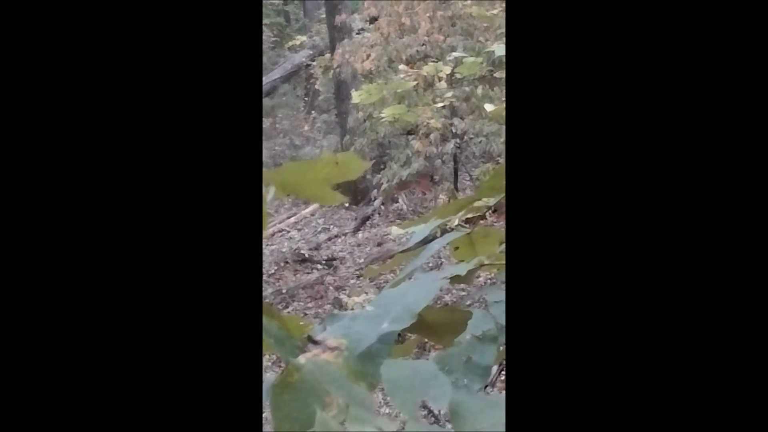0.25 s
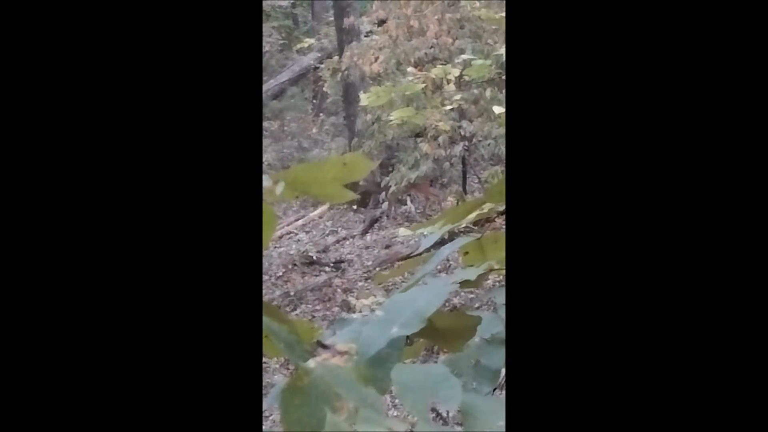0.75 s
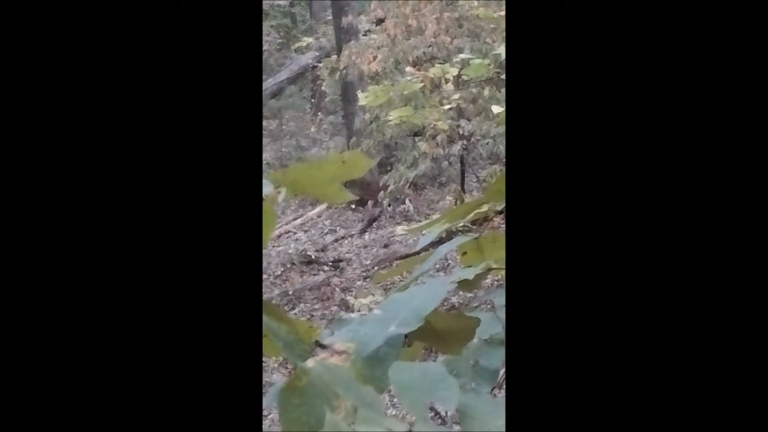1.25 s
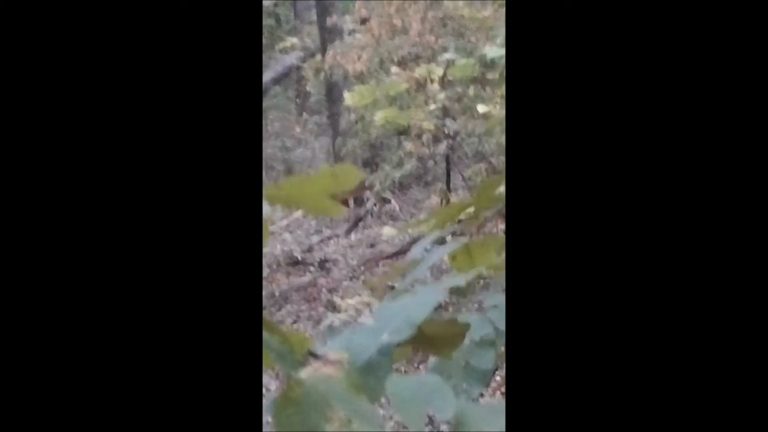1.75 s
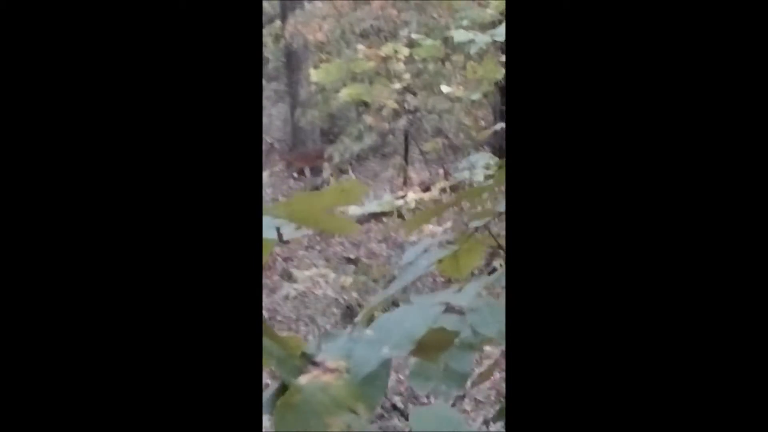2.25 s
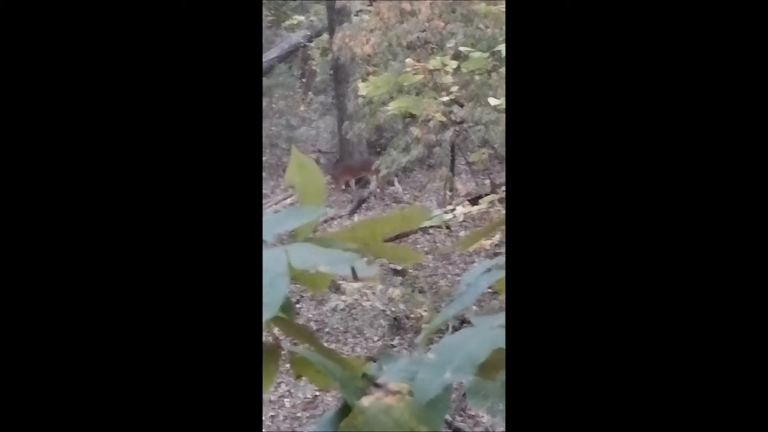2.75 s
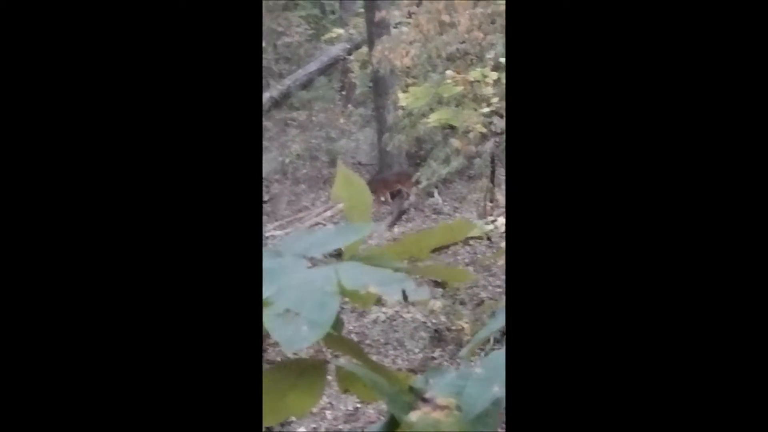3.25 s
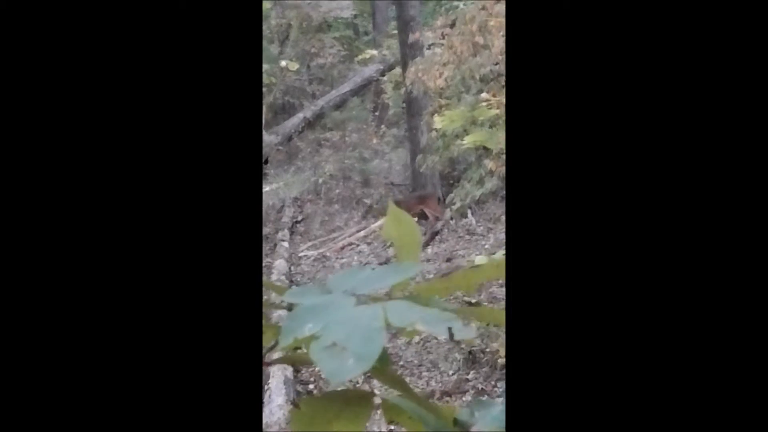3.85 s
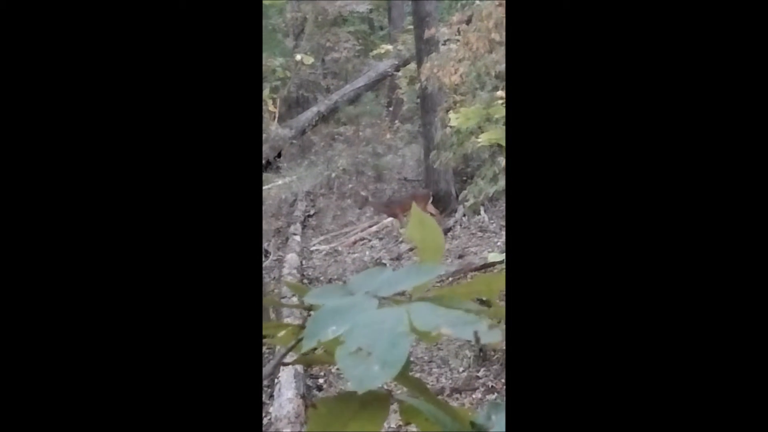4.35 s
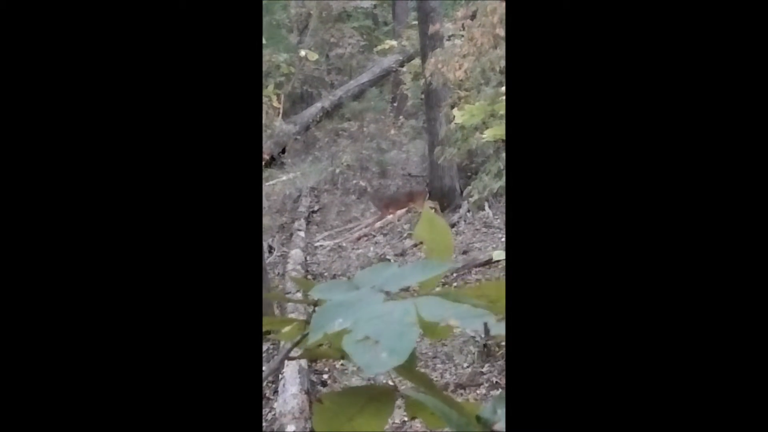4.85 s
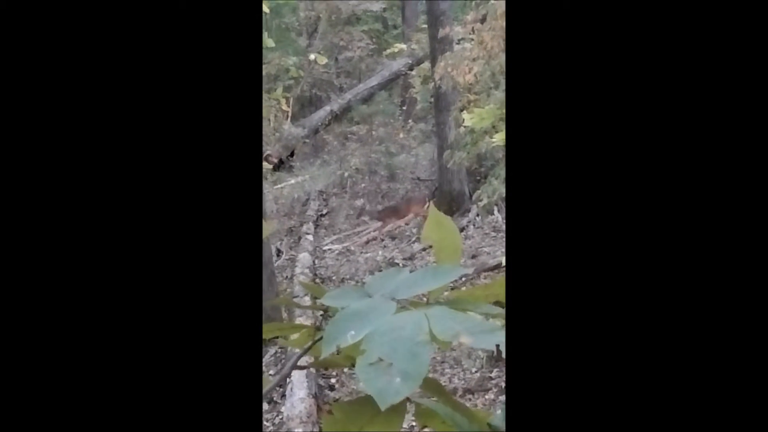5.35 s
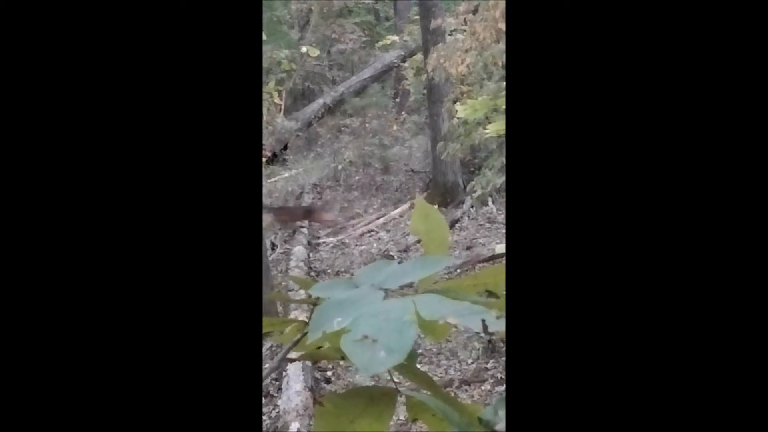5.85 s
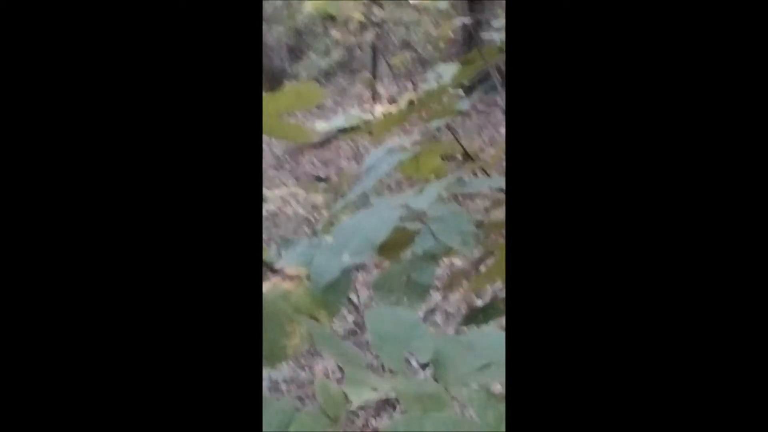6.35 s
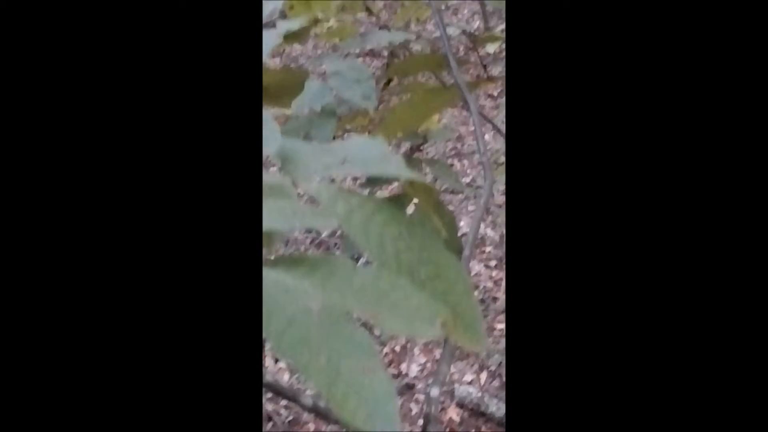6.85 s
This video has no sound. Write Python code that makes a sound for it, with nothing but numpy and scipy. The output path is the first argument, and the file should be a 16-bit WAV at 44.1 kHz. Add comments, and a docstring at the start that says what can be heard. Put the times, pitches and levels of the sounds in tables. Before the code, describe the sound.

Bush crickets chirp in short pulsed tones over a faint distant chorus and soft air noise in open woodland. After nearly five seconds of small fidgeting, a close bow release cracks out very loudly and dies fast, with only a thin scatter from the trees. The archer then moves, rustling cloth and leaves, with low bumps, sharp clicks and a faint sinking swish.

```python
"""Quiet autumn woodland at a camera's microphones: a faint hush of air noise with low puffs at the ports.
Bush crickets chirp all around in short tone pulses, over a far chorus and a lower trill of narrow noise.
Close by, an archer's sleeves and dry leaves rustle as grainy noise, with small ringing clicks.
At about five seconds the bow is shot: the string whips, slams home, and the bow knocks, buzzes and shudders.
The rustling grows as the bow is lowered, with low soft bumps and a faint hollow swish that sinks in pitch."""
import sys
import numpy as np
from scipy import signal
from scipy.fft import rfft, irfft, next_fast_len
from scipy.io import wavfile
from scipy.ndimage import uniform_filter1d, map_coordinates

SR = 44100
rng = np.random.default_rng(int(sys.argv[2]) if len(sys.argv) > 2 else 0)


def pcm_store(signal):
    """Save signal as 16-bit PCM."""
    levels = np.round(np.clip(np.atleast_2d(signal), -1, 1) * 32767)
    wavfile.write(sys.argv[1], SR, levels.astype(np.int16).T)


N = 312669
TIME = np.arange(N) / SR
SIDES = np.array([[.5], [-.5]])  # shares a left-minus-right value between the left and right port


def amp(db):
    """Decibels to gain."""
    return 10 ** (np.asarray(db) / 20)


def unit(x):
    """Scaled to rms 1."""
    return x / np.sqrt(np.mean(x ** 2) + 1e-20)


def along(points, hz):
    """Reads a curve of (Hz, value) points on a log frequency axis."""
    f, v = np.transpose(points)
    return np.interp(np.log(hz + 1), np.log(f + 1), v)


def wobble(rate):
    """A smooth random curve with this many random knots a second."""
    knots = rng.standard_normal(int(N * rate / SR) + 4)
    return map_coordinates(knots, [TIME * rate])


def fade(t, t60):
    """Exponential decay by 60 dB in t60 seconds, silent before t = 0."""
    return (t >= 0) * np.exp(-np.log(1000) * np.abs(t) / t60)


def swell(s, db, rise, t60):
    """Gain of one movement: a smooth rise, then an exponential decay."""
    t = TIME - s
    onset = np.sin(np.pi / 2 * np.clip(t / rise, 0, 1)) ** 2
    return amp(db) * onset * fade(np.maximum(t - rise, 0), t60)


def together(swells):
    """Overlapping movements add in power."""
    return np.sqrt(sum(g ** 2 for g in swells))


def add(track, s, sound):
    """Mixes a sound in at s seconds; a negative start plays from zero."""
    part = track[..., max(round(s * SR), 0):][..., :sound.shape[-1]]
    part += sound[..., :part.shape[-1]]


def filtered(x, response):
    """Shapes x by a response, possibly complex, given as a function of frequency."""
    m = next_fast_len(N + 8192)
    return irfft(rfft(x, m) * response(np.fft.rfftfreq(m, 1 / SR)), m)[..., :N]


def rush(spectrum, alike, grain=1):
    """Coloured stereo noise of rms 1, excited evenly or in grains."""
    def mid_side(hz):
        # this split of mid and side power gives the wanted left-right correlation
        turn = np.arccos(np.clip(along(alike, hz), -1, 1)) / 2
        return amp(along(spectrum, hz)) * np.array([np.cos(turn), np.sin(turn)])
    mid, side = filtered(grain * rng.standard_normal((2, N)), mid_side)
    return unit(np.array([mid + side, mid - side]))


def place(x, balance, lead_ms):
    """A near sound reaches the left port first; the camera body shades each port by frequency."""
    def ports(hz):
        early = np.exp(2j * np.pi * hz * SIDES * lead_ms / 1000)
        return amp(SIDES * along(balance, hz)) * early
    return filtered(x, ports)


def ring(modes, t, attack):
    """Damped modes, each (Hz, dB, t60 in s), set going by one blow."""
    tones = sum(amp(db) * fade(t, t60) * np.sin(2 * np.pi * hz * t) for hz, db, t60 in modes)
    return tones * (1 - np.exp(-t / attack))


# How long the trees scatter sound back. Each row: frequency in Hz, t60 in seconds.
TREE_DECAY = [(200, .3), (2000, 0.29), (5000, 0.36), (14000, 0.51)]


def woods(x):
    """Trunks and foliage scatter back a thin noise tail that decays differently by frequency."""
    hz, t, z = signal.stft(rng.standard_normal((2, SR // 2)), SR, nperseg=256)
    decay = fade(t, along(TREE_DECAY, hz)[:, None])
    tail = signal.istft(z * decay, SR, nperseg=256)[1]
    return signal.fftconvolve(x, tail / np.linalg.norm(tail[0]), axes=1)[:, :N]


# Colour of the hush. Each row: frequency in Hz, relative level per Hz in dB.
HUSH_COLOUR = [(59, -25.5), (100, 0), (500, -12), (925, -14.5), (1860, -20.5), (3900, -22.5), (4720, -19),
               (6220, -24.5), (11300, -22.5), (12800, -23.5), (13900, -19), (15800, -21)]
# Colour of the puffs and drift at the ports. Each row: frequency in Hz, relative level per Hz in dB.
PUFF_COLOUR = [(8.8, -28), (15, 5.5), (35, -.5), (75, -8.5), (161, -25.5), (200, -23.5), (260, -52),
               (440, -120)]
# How alike the ports hear air and far crickets. Each row: frequency in Hz, left-right correlation.
FAR_ALIKE = [(60, .3), (130, 0.23), (600, 0.33), (1400, 0.18), (3000, 0.022)]
# Puffs at the ports, from breeze or moving camera. Each row: start in seconds, level in dB before the flow trim.
AIR_PUFFS = [(.47, -65), (.64, -64), (.98, -65.5), (1.67, -65), (1.82, -68), (2.29, -64.5), (3.47, -66),
             (5.64, -54), (6.01, -61.5), (6.2, -54), (6.6, -61.5)]
PUFF_RISE_S, PUFF_T60_S = .05, .4  # every puff swells and dies alike
BREEZE_DB, GUSTY_DB = -72.5, 1.5  # steady drift before the flow trim, and its random swing
FLOW_TRIM_DB = 4


def air():
    """A faint even hush; air moving at the microphone ports makes low noise that drifts and puffs."""
    hush = amp(-69.5 + 0.37 * wobble(2)) * rush(HUSH_COLOUR, FAR_ALIKE)
    drift = amp(BREEZE_DB + GUSTY_DB * wobble(5))
    puffs = [swell(s, db, PUFF_RISE_S, PUFF_T60_S) for s, db in AIR_PUFFS]
    flow = together([drift] + puffs)
    return hush + amp(FLOW_TRIM_DB) * flow * rush(PUFF_COLOUR, FAR_ALIKE)


# The nearer chirps. Each row: start in seconds, middle pitch in Hz, level in dB before scattering and trim.
NEAR_CHIRPS = [(-.05, 4770, -72), (.04, 5230, -75), (.2, 5020, -75), (.3, 4890, -75), (.535, 4760, -70),
               (1.015, 4920, -70.5), (1.048, 4720, -72), (1.48, 4740, -73), (1.57, 4620, -75),
               (1.67, 5020, -78), (1.935, 5195, -65.3), (2.22, 4710, -72), (2.28, 5030, -75.5),
               (2.44, 4780, -78), (2.99, 4920, -72.5), (3.14, 4900, -78), (3.6, 4550, -73),
               (3.89, 5190, -68.5), (4.04, 5070, -77), (4.235, 4730, -72), (4.275, 5210, -74),
               (4.36, 4730, -73.5), (4.55, 4700, -72), (4.77, 4920, -77), (6.54, 4710, -69),
               (6.599, 5230, -70.5), (6.92, 4840, -74.5)]
# A lower, steady cricket. Each row: start in seconds, end in seconds.
TRILL_SPANS = [(1.25, 2.23), (4.2, 4.95)]
# Colour of the far crickets. Each row: frequency in Hz, relative level per Hz in dB.
CHORUS_COLOUR = [(4300, -34), (4600, 1.5), (4780, 0.5), (5050, -4.5), (5400, -49)]
CHIRP_S, CHIRP_FALL = .145, .012  # length of a chirp, and the share by which its pitch falls


def chirp_call(hz, pace, lag, pulse_hz=59, sag=0.024):
    """One chirp at both ports: each wing stroke is a short tone that sags in pitch."""
    t = np.arange(int(CHIRP_S * SR)) / SR
    stroke = t * pulse_hz * (1 + .04 * pace) % 1  # position within the wing stroke, 0 to 1
    pitch = hz * (1 + sag * (1 - 2 * stroke) + CHIRP_FALL * (.5 - t / CHIRP_S))
    tone = np.sin(2 * np.pi * np.cumsum(pitch) / SR + SIDES * lag)
    return tone * np.sin(np.pi * stroke) ** 2 * signal.windows.tukey(len(t), .3)


def crickets(spread_db=3, trill_hz=2640):
    """Pulsed chirps smeared by the woods, a trill and a far chorus of narrow-band noise."""
    calls = np.zeros((2, N))
    for (s, hz, db), (pan, lag, pace) in zip(NEAR_CHIRPS, rng.standard_normal((len(NEAR_CHIRPS), 3))):
        # every chirp sits in its own direction
        add(calls, s, amp(db + spread_db * pan * SIDES) * chirp_call(hz, pace, lag))
    calls = calls * amp(2.0 * wobble(50))  # the strokes vary in strength
    scattered = .8 * calls + woods(calls)
    on = sum(1. * ((TIME > start) & (TIME < end)) for start, end in TRILL_SPANS)
    singing = uniform_filter1d(on, size=4000)  # soft starts and ends
    trill_colour = [(trill_hz * .8, -60), (trill_hz * .98, 0), (trill_hz * 1.02, 0), (trill_hz * 1.2, -60)]
    trill = amp(-88.5 + 2 * wobble(12)) * singing * rush(trill_colour, FAR_ALIKE)
    chorus = amp(-89.3 + 2 * wobble(4)) * rush(CHORUS_COLOUR, FAR_ALIKE)
    return amp(-1.5) * scattered + trill + chorus


BAND_S, BAND_DB, BAND_RISE_S, BAND_T60_S = 6.055, -65, .025, .9
# where the band starts and ends, how fast it sinks, and roughly how wide it is
BAND_HZ, BAND_FLOOR_HZ, BAND_SAG_HZ_PER_S, BAND_WIDTH_HZ = 1830, 1350, 4000, 520


def sinking_band():
    """A narrow band of noise that sinks in pitch, then holds at a floor as it fades."""
    sinking = BAND_HZ - BAND_SAG_HZ_PER_S * (TIME - BAND_S)
    hz = np.clip(sinking, BAND_FLOOR_HZ, BAND_HZ)
    flutter = wobble(BAND_WIDTH_HZ) + 1j * wobble(BAND_WIDTH_HZ)
    band = flutter * np.exp(2j * np.pi * np.cumsum(hz) / SR)
    return swell(BAND_S, BAND_DB, BAND_RISE_S, BAND_T60_S) * unit(band.real)


# Strokes of sleeves and leaves, small while aiming, larger as the bow is lowered.
# Each row: start in seconds, level in dB before the rustle trim, rise in seconds, t60 in seconds.
RUB_STROKES = [(.151, -77, .09, .9), (.28, -73.2, .02, .34), (.841, -77.6, .07, 1.6),
               (1.18, -72.2, .14, .45), (1.506, -70, .005, .1), (1.53, -80, .04, 1.8),
               (1.63, -73, .005, .1), (2.45, -77.2, .025, 1), (2.468, -77.3, .3, 2),
               (3.764, -74.6, .09, .55), (3.877, -75.2, .085, .77), (4.19, -74.5, .02, .5),
               (4.819, -69.8, .275, .92), (5.136, -66, .1, 1.13), (5.258, -60.7, .02, .17),
               (5.371, -67.4, .12, .5), (5.489, -53.4, .036, .31), (5.508, -51, .05, .48),
               (5.604, -54.3, .025, .38), (5.652, -45.6, .019, .27), (5.668, -48, .052, .17),
               (5.736, -64.8, .085, 1.23), (5.928, -67.8, .027, 1.5), (6.03, -63, .055, .14),
               (6.148, -60.3, .03, .3), (6.179, -54.8, .024, .59), (6.264, -62.2, .028, .14),
               (6.298, -76.3, .15, 1.06), (6.595, -67.1, .04, .24), (6.627, -64.9, .036, 1.17)]
# Low soft bumps: one as the bow is shot, the others during handling.
# Each row: start in seconds, level in dB, t60 in seconds.
LOW_BUMPS = [(4.969, -46, .33), (5.506, -58, .15), (5.658, -41.3, .15), (5.705, -49, .13),
             (6.02, -63.5, .5), (6.161, -59.5, .25), (6.235, -64, .25)]
# Colour of sleeves and leaves. Each row: frequency in Hz, relative level per Hz in dB.
RUSTLE_COLOUR = [(200, -15), (450, -8.5), (1000, -7), (1400, -5), (2000, -3.2), (2800, -5.2), (4200, -4.2),
                 (6000, -1), (8300, -2), (10500, -4.5), (15800, -12.5)]
# Colour of the low bumps. Each row: frequency in Hz, relative level per Hz in dB.
BUMP_COLOUR = [(20, -13), (40, -2), (110, -.5), (200, -4), (300, -8.5), (450, -22.5), (900, -53)]
# Colour of the soft noise in the swish. Each row: frequency in Hz, relative level per Hz in dB.
SWISH_COLOUR = [(250, -22), (560, -3.5), (900, -6), (1400, -1), (2100, -9), (4000, -8), (9000, -36)]
# How alike the ports hear close noise. Each row: frequency in Hz, left-right correlation.
CLOSE_ALIKE = [(150, .93), (600, .8), (1500, 0.36), (4000, 0.13), (15000, 0.083)]
# Lean of the rustling between the ports. Each row: frequency in Hz, left minus right in dB.
RUSTLE_BALANCE = [(500, 3), (1600, -4.5), (5000, -2.5), (12000, -2)]
FIDGET_DB, RUSTLE_TRIM_DB = -89, 2.8  # the archer is never quite still; trim on all rubbing
BUMP_SHARE_DB = -12  # how much of every stroke, before its trim, reaches the camera through the arm
BUMP_RISE_S = .008  # a soft onset
SWISH_S, SWISH_DB, SWISH_RISE_S, SWISH_T60_S = 6.09, -57, .14, .32  # a faint hollow swish


def rustling(crackles_per_s=130):
    """Cloth and dry leaves rub in dense tiny slips with stray crackles; low bumps and a swish join in."""
    rub = together([amp(FIDGET_DB)] + [swell(*stroke) for stroke in RUB_STROKES])
    thuds = [swell(s, db, BUMP_RISE_S, t60) for s, db, t60 in LOW_BUMPS]
    handling = together([amp(BUMP_SHARE_DB) * rub] + thuds)
    slips = amp(1.7 * wobble(1500) + 1.4 * wobble(90))
    breaks = (rng.random(N) < crackles_per_s / SR) * amp(5 * rng.standard_normal(N))
    crackle = signal.fftconvolve(breaks, fade(np.arange(SR // 100) / SR, 0.0036))[:N]
    texture = rush(RUSTLE_COLOUR, CLOSE_ALIKE, grain=slips)
    texture = texture + amp(-10) * rush(RUSTLE_COLOUR, CLOSE_ALIKE, grain=crackle)
    rustle = amp(RUSTLE_TRIM_DB) * rub * texture
    bumps = handling * rush(BUMP_COLOUR, CLOSE_ALIKE)
    swish_gain = swell(SWISH_S, SWISH_DB, SWISH_RISE_S, SWISH_T60_S)
    swish = swish_gain * rush(SWISH_COLOUR, CLOSE_ALIKE, grain=slips) + sinking_band()
    return place(rustle + swish, RUSTLE_BALANCE, lead_ms=.25) + bumps


# Small clicks nearby. Each row: start in seconds, level in dB, pitch in Hz, t60 in seconds,
# broadband snap in dB relative to that level, left minus right in dB.
SMALL_CLICKS = [(1.718, -72, 3000, .014, 8.5, 4), (1.728, -74, 3000, .014, 9, 4),
                (4.7153, -71, 3520, .018, 8.5, 4), (5.273, -61, 2170, .045, 2, -3.5),
                (5.513, -61, 1900, .029, -3, -3), (5.622, -51.5, 2070, .05, 1, -4),
                (5.662, -48, 3450, .027, 6, -3), (5.829, -56, 2220, .033, 0, -3.5),
                (6.014, -46, 3040, .0076, -2, -5.5), (6.0505, -46.5, 4460, .017, -4.5, -5),
                (6.0603, -36.3, 3180, .008, -12, -8)]
# Colour of a click's snap. Each row: frequency in Hz, relative level per Hz in dB.
SNAP_COLOUR = [(250, 0), (600, -3.5), (2000, 1.5), (4500, -2.5), (7000, -11), (15000, -20)]


def clicks():
    """A short broadband snap with one damped resonance, each from its own direction."""
    tones, snaps = np.zeros((2, 2, N))
    t = np.arange(SR // 8) / SR
    for s, db, hz, t60, snap_db, pan_db in SMALL_CLICKS:
        gain = amp(db + pan_db * SIDES)
        add(tones, s, gain * ring([(hz, 0, t60)], t, attack=0.00012))
        add(snaps, s, gain * amp(snap_db) * fade(t, t60))
    return tones + snaps * rush(SNAP_COLOUR, CLOSE_ALIKE)


RELEASE_S, STOP_S = 4.964, 4.9847  # the string is let go, and stops
WHIP_DB = -44  # the string sweeps forward, from release to stop
BUZZ_DB, BUZZ_S, BUZZ_CURVE = -27.8, .103, 1.45  # after the stop, friction uses up the buzz in this time
QUIVER_DB, QUIVER_T60_S = -55, .55  # a faint quiver lingers


def shaking(attack=.003):
    """How hard the bow shakes: the string whips forward, stops, and friction wears the buzz down."""
    t = TIME - STOP_S
    whip = amp(WHIP_DB) * np.clip((TIME - RELEASE_S) / (2 * attack), 0, 1) * (t < attack)
    wear = np.clip(1 - t / BUZZ_S, 0, 1) ** BUZZ_CURVE
    buzz = amp(BUZZ_DB) * np.clip(t / attack, 0, 1) * wear
    return together([whip, buzz, swell(STOP_S, QUIVER_DB, attack, QUIVER_T60_S)])


# Contacts of string, arrow and bow. Each row: start in seconds, knock level in dB before the knock trim,
# crack level in dB, crack t60 in seconds.
BOW_CONTACTS = [(4.9665, -38, -43, .02), (4.9692, -25, -28, .024), (4.9762, -29, -49, .02),
                (4.9851, -10.5, -21, 0.019), (4.9866, -12.5, -22.5, .018), (4.9959, -14.5, -29.5, 0.023),
                (4.9998, -34.5, -19.5, 0.019), (5.0078, -23.5, -44, 0.017), (5.0133, -30, -25.5, .022),
                (5.0212, -43.5, -28, 0.016), (5.0462, -42, -34, 0.026)]
# What the riser rings with. Each row: frequency in Hz, relative level in dB, t60 in seconds.
RISER_MODES = [(440, -18.5, 0.039), (655, -12.5, 0.021), (1140, -9, 0.015), (1300, -3.5, 0.019),
               (1392, -2.5, 0.019), (1820, -20, 0.0086), (2227, -7, 0.047)]
# Small metal parts. Each row: frequency in Hz, relative level in dB, t60 in seconds.
FITTING_MODES = [(5800, -6, .07), (6940, -2.5, .08), (7100, 3.5, 0.067), (7800, -4.5, 0.06),
                 (8330, -7, .06)]
# The shudder of the limbs. Each row: frequency in Hz, relative level in dB, t60 in seconds.
LIMB_MODES = [(53, 0, .125), (156, -3.5, .075), (208, -7, .07), (318, -14, .06)]
# Colour of the cracks. Each row: frequency in Hz, relative level per Hz in dB.
CRACK_COLOUR = [(600, -22.5), (1900, -1.5), (2800, -6), (3700, -9.5), (4800, -0.5), (6900, .8),
                (9000, -5.3), (12000, -10.5), (15800, -15)]
# Rough broadband colour of the buzz noise, with arbitrary small peaks.
# Each row: frequency in Hz, relative level per Hz in dB.
BUZZ_COLOUR = [(120, -31.5), (200, -7), (340, -3), (393, -12.5), (746, -5.5), (879, -13), (1040, -7),
               (1120, -5), (1760, -5), (2190, -11.5), (2680, -9.5), (4480, -9), (6810, -7.5), (14400, -15),
               (15800, -23)]
# Lean of the shot between the ports. Each row: frequency in Hz, left minus right in dB.
SHOT_BALANCE = [(600, 1.5), (1400, -3.5), (3000, 1), (6000, -4.5), (9000, -1.5), (15000, 2)]
SLAM_DB, SLAM_HZ, SLAM_T60_S = -17.5, 120, .035  # the limbs reach their stop and push the air
REBOUND_S, REBOUND_DB = 5.0028, -20  # the bow jumps in the hand
KNOCK_TRIM_DB = -3


def bow():
    """Each contact knocks the riser, cracks and rings the fittings; the bow buzzes and its limbs shudder."""
    knocks, cracks, metal, shudder = np.zeros((4, N))
    t = np.arange(SR // 2) / SR
    for s, knock_db, crack_db, t60 in BOW_CONTACTS:
        add(knocks, s, amp(knock_db) * ring(RISER_MODES, t, attack=0.00027))
        add(cracks, s, amp(crack_db) * fade(t, t60))
        add(metal, s, amp(crack_db - 22) * ring(FITTING_MODES, t, attack=.0003))
    # both low blows start with a negative swing
    add(shudder, STOP_S, -ring([(SLAM_HZ, SLAM_DB, SLAM_T60_S)], t, attack=.0006))
    add(shudder, REBOUND_S, -amp(REBOUND_DB) * ring(LIMB_MODES, t, attack=.002))
    crack = cracks * rush(CRACK_COLOUR, CLOSE_ALIKE, grain=amp(3 * wobble(3000)))
    buzz = shaking() * rush(BUZZ_COLOUR, CLOSE_ALIKE, grain=amp(3.2 * wobble(900)))
    knock_balance = [(700, 2.5), (1250, -6.5), (2200, -5.5)]  # (Hz, left minus right dB)
    knock = place(amp(KNOCK_TRIM_DB) * knocks, knock_balance, lead_ms=.22)
    return knock + place(crack + buzz + metal, SHOT_BALANCE, lead_ms=.26) + shudder


def scene():
    """The archer close by with a faint tail from the trees, and the woodland around."""
    near = bow() + rustling() + clicks()
    return near + amp(-31) * woods(near) + crickets() + air()


def record(dry, top_hz=15900):
    """The camera cuts steeply above its band limit."""
    return filtered(dry, lambda hz: 1 / np.sqrt(1 + (hz / top_hz) ** 200))


dry = scene()
out = record(dry)
pcm_store(out)
```